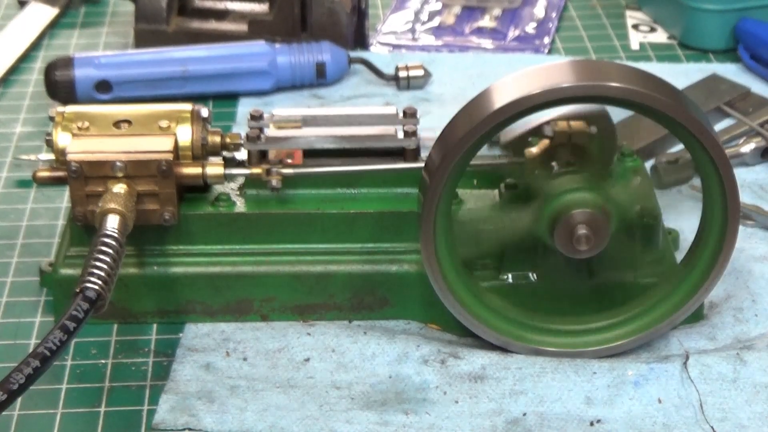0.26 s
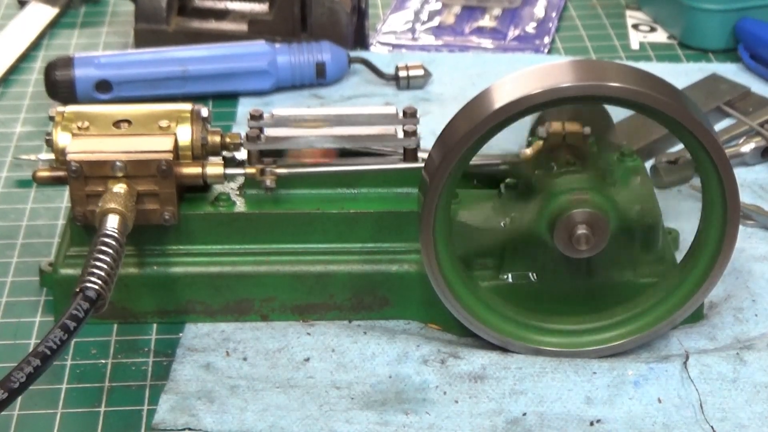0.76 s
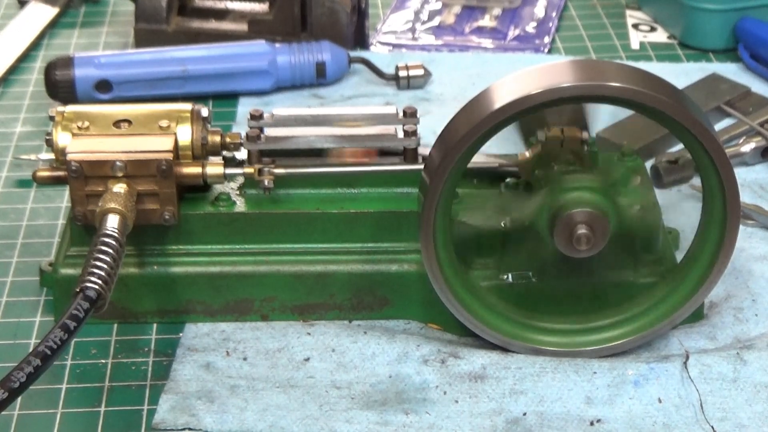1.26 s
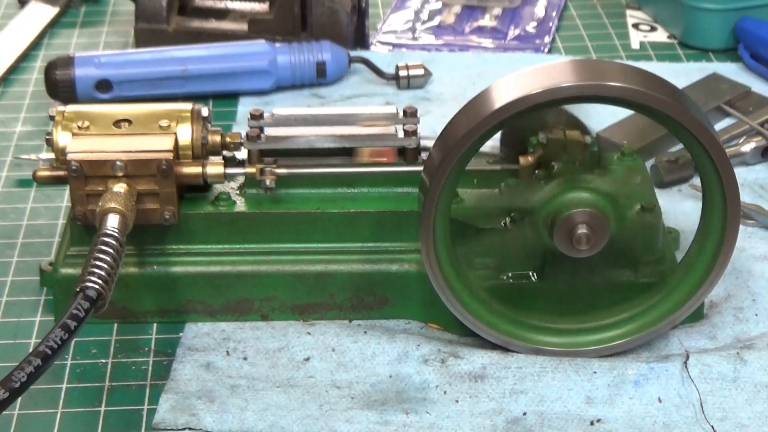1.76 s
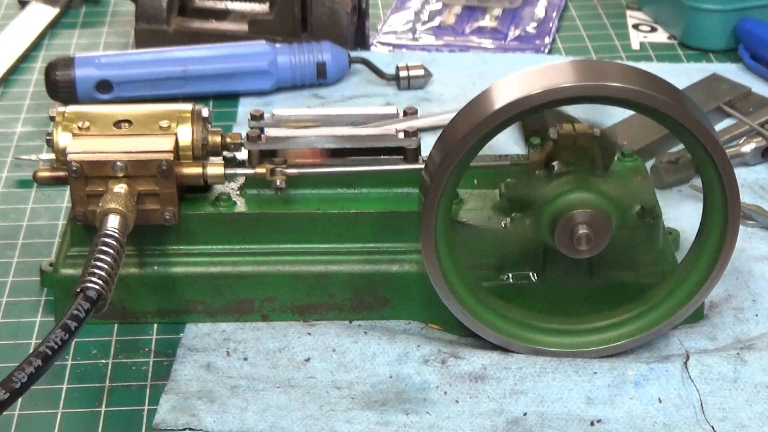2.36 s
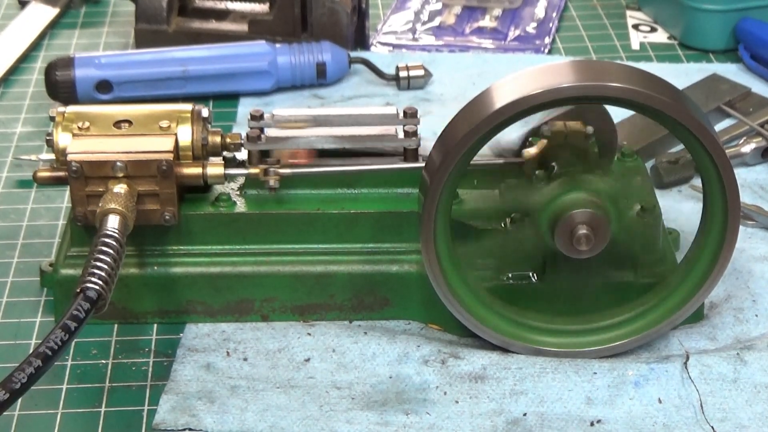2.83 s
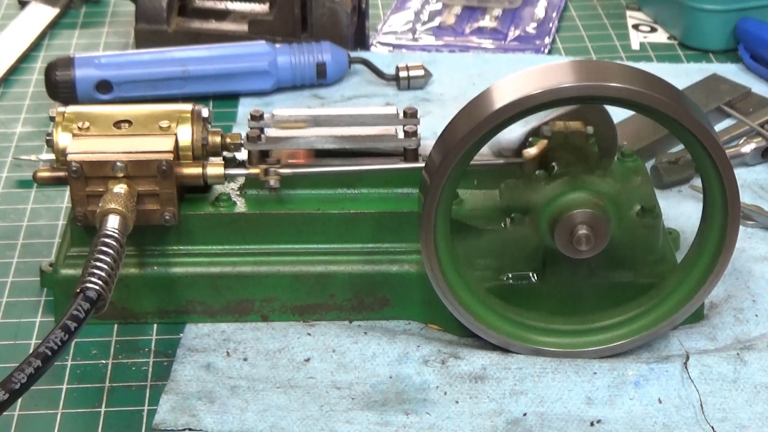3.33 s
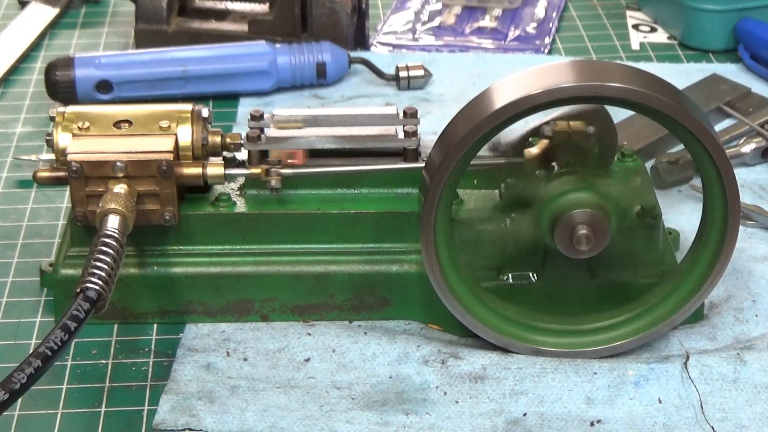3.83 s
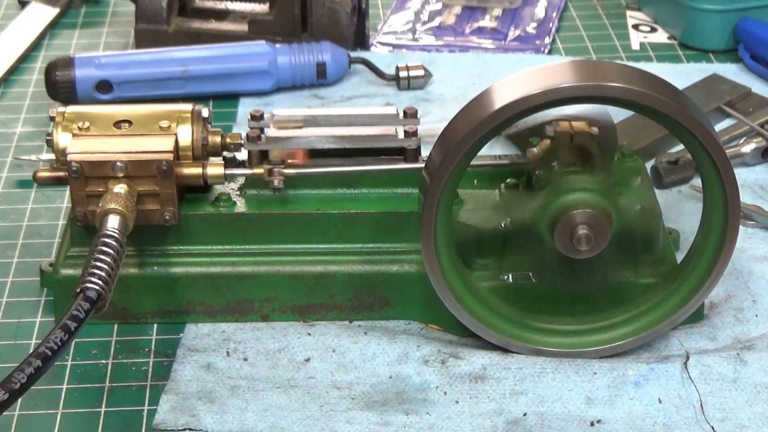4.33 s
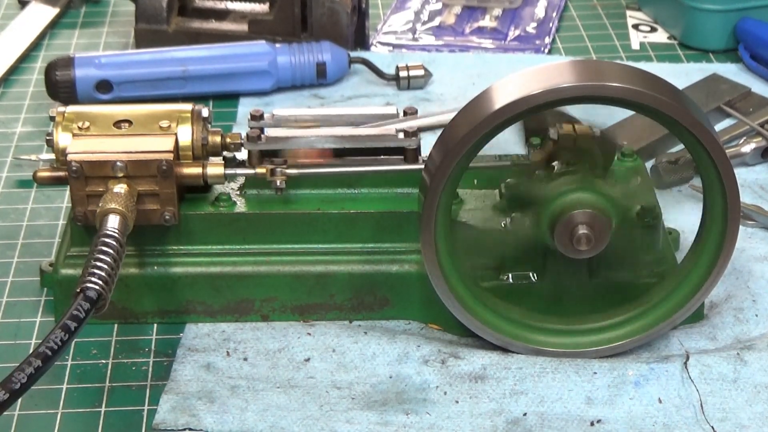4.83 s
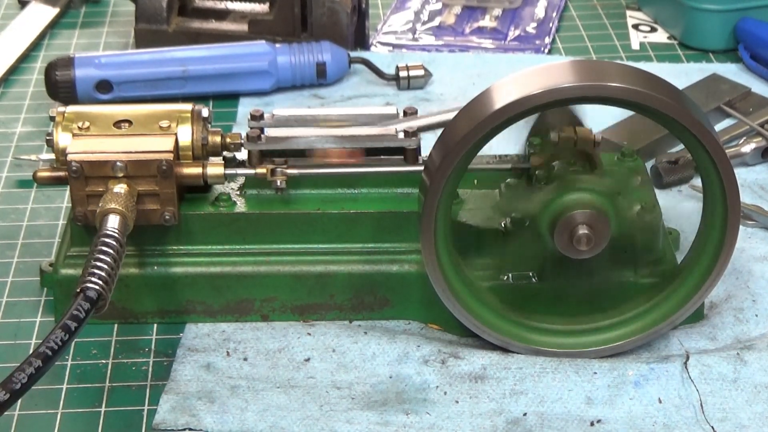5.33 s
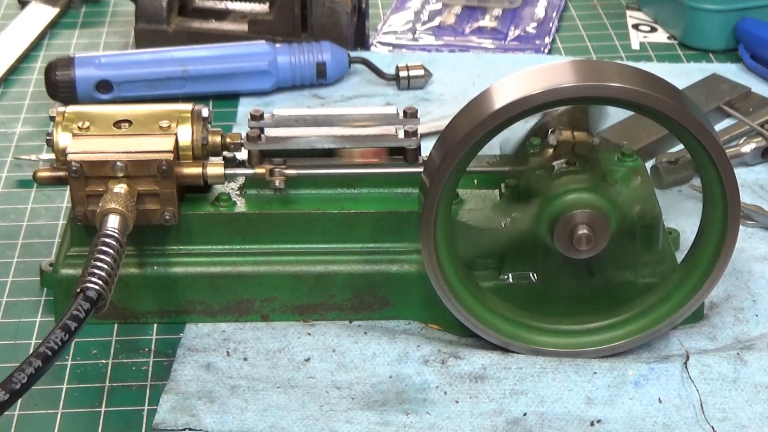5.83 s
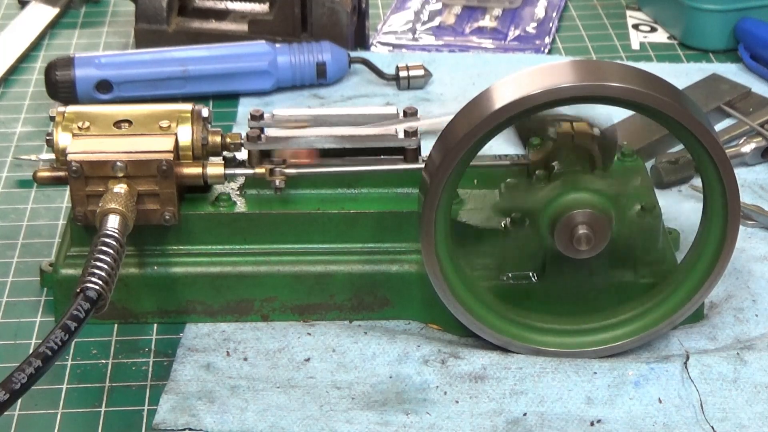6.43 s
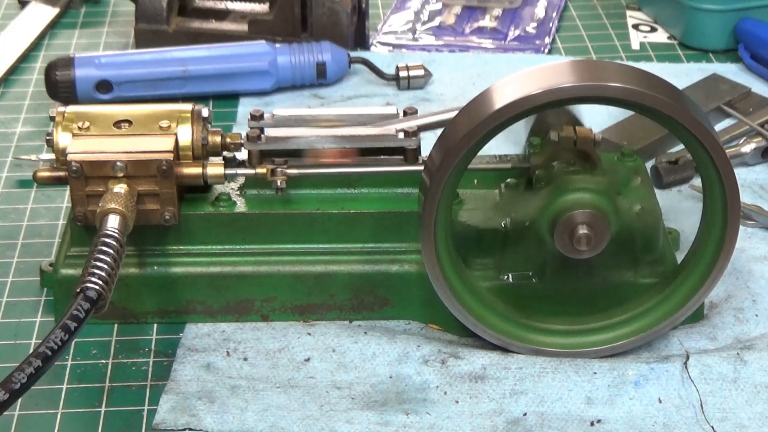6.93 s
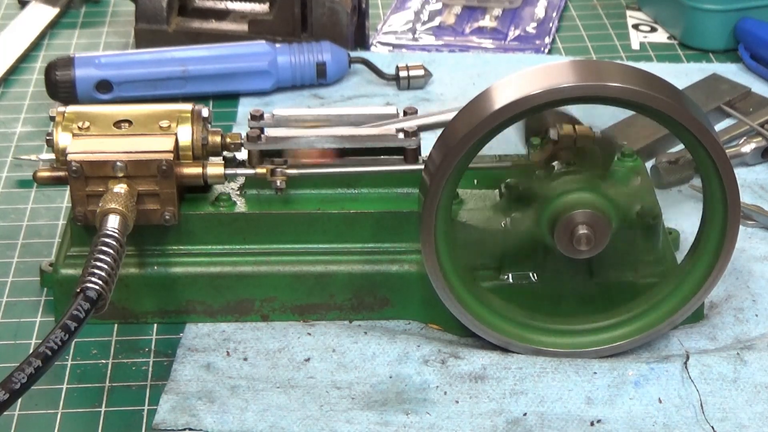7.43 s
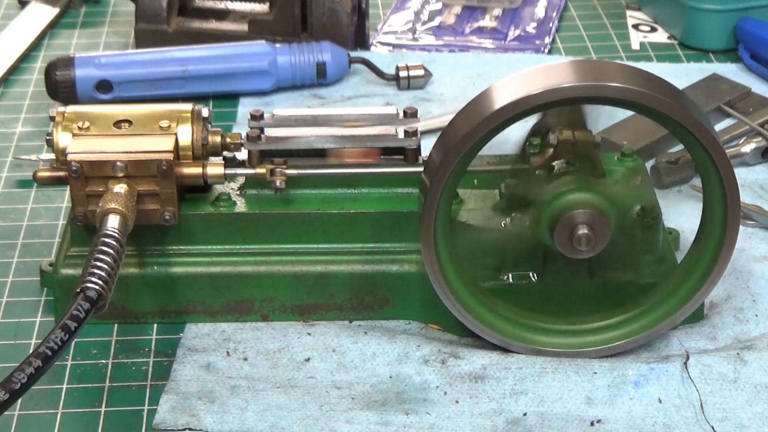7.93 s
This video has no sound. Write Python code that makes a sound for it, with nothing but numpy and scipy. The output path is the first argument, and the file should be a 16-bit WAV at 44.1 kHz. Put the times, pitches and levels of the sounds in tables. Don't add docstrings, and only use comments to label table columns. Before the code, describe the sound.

A small piston engine on compressed air chuffs quickly and sharply at close range, about six turns a second, over a thin compressor whine, after two bench clatters.

```python
import sys
import numpy as np
from scipy import signal
from scipy.fft import rfft, irfft, next_fast_len
from scipy.io import wavfile

SR = 44100
rng = np.random.default_rng(int(sys.argv[2]) if len(sys.argv) > 2 else 0)


def gain_from_db(level_db):
    decades = np.asarray(level_db, float) / 20
    return 10 ** decades


def dump(signal):
    limited = np.clip(np.atleast_2d(signal).T, -1, 1)
    pcm = np.round(limited * 32767).astype(np.int16)
    wavfile.write(sys.argv[1], SR, pcm)


N = 361179
TIME_S = np.arange(N) / SR
START_TURN, TURN_COUNT = .7427, 52


def rms_one(x):
    return x / np.sqrt(np.mean(x ** 2) + 1e-20)


def over_time(points):
    return np.interp(TIME_S, *np.transpose(points))


def at_hz(points, hz):
    point_hz, value = np.transpose(points)
    return np.interp(np.log(hz + 1), np.log(point_hz), value)


def humps(peaks, hz):
    power = 1
    for peak_hz, width_hz, db in peaks:
        power = power + (gain_from_db(db) ** 2 - 1) / (1 + (2 * (hz - peak_hz) / width_hz) ** 2)
    return np.sqrt(power)


def drift(rate):
    pole = np.exp(-80 * np.pi * rate / SR)
    noise = rng.standard_normal(N // 40 + 2002)
    slow = signal.lfilter([1], [1, -2 * pole, pole * pole], noise)[2000:]
    return np.interp(np.arange(N) / 40, np.arange(len(slow)), rms_one(slow))


def ring(clicks, hz, t60):
    decay, step = gain_from_db(-60 / (t60 * SR)), 2 * np.pi * hz / SR
    return signal.lfilter([0, np.sin(step)], [1, -2 * decay * np.cos(step), decay * decay], clicks + 1e-18)


# pitch_hz, side_minus_mid [dB]
SIDE_DB = [(60, -41), (92, -43), (140, -34), (210, -27), (330, -28), (500, -53), (770, -10), (1170, -8),
           (1790, -24), (2740, -19.5), (4190, -21.5), (6410, -19), (9810, -25.5), (15000, -62)]


def coloured(gain_at, side_db):
    size = next_fast_len(N)
    hz = np.arange(size // 2 + 1) * SR / size
    both = rfft(rng.standard_normal((2, size))) * gain_at(hz)
    both[1] *= gain_from_db(at_hz(SIDE_DB, hz) + side_db)
    mid, side = irfft(both, size)[:, :N]
    return np.array([mid + side, mid - side]) / np.std(mid)


# shaft_order [multiple of shaft rate], level_db [dB rms]
ORDERS_DB = [(9, -65), (13, -64), (17, -62), (21, -62), (22, -52), (24, -49), (25, -56), (26, -59),
             (27, -59), (29, -59), (31, -59), (32, -60), (33, -56), (36, -49), (37, -57), (39, -53),
             (41, -56), (44, -50.5), (45, -49), (46, -42), (47, -38), (48, -46), (49, -49), (50, -52),
             (52, -55), (54, -58), (57, -55), (58, -56), (59, -56), (66, -57)]
# pitch_hz, level_db [dB rms]
WEAK_ORDERS = [(40, -73), (100, -68.5), (500, -81), (900, -73), (2000, -74.5), (2800, -58), (3300, -78)]
# pitch_hz, width_hz, height_db
CASING = [(238, 55, 7.5), (712, 54, 15), (1057, 120, 9.5), (1342, 33, 10), (1714, 97, 5)]
# pitch_hz, level_db [dB per Hz]
RUMBLE = [(25, -36), (60, -20), (150, -12), (400, -10), (900, -9.5), (1300, -2.5), (2000, -0.5),
          (3500, -14.5), (6000, -35)]


def compressor():
    motor_hz, motor_start_s, rumble_db = 29.323, .0044, -39.5
    shaft = 2 * np.pi * motor_hz * (TIME_S - motor_start_s) + 0.0048 * drift(0.96)
    out = gain_from_db(rumble_db) * coloured(lambda hz: gain_from_db(at_hz(RUMBLE, hz)) * humps(CASING, hz), side_db=1.5)

    orders, angle = np.arange(2, 112), np.linspace(0, 2 * np.pi, 4097)
    level_db = at_hz(WEAK_ORDERS, orders * motor_hz) + 3.9 * rng.standard_normal(len(orders))
    for order, db in ORDERS_DB:
        level_db[order - 2] = db + 1.04

    spread = 1.75 * (orders - 47) ** 2
    shift = 0.24 * np.clip(orders / 24, 0, 1) ** 2 * np.sign(rng.standard_normal(len(orders)))
    for group in range(4):
        k = slice(group, None, 4)
        swell = gain_from_db(1.0 * drift(3.9))
        for channel, sign in enumerate((1, -1)):
            phase = (spread + sign * shift)[k, None]
            one_turn = gain_from_db(level_db[k]) @ np.cos(np.outer(orders[k], angle) + phase)
            out[channel] += np.sqrt(2) * swell * np.interp(shaft % (2 * np.pi), angle, one_turn)
    return out


# start_s, peak_db, pitch_hz, t60_s
KNOCKS = [(0.102, -19, 1500, .008), (0.1016, -27, 480, .03), (.1075, -11, 2000, 0.012),
          (0.1088, -14, 1236, .04), (0.1252, -9.5, 2150, .015), (.126, -25, 710, 0.037),
          (.127, -28, 320, 0.083), (.18, -16.5, 1300, .018), (.14, -15, 2920, 0.072),
          (.368, -28.5, 230, .07), (.371, -24.5, 640, 0.18), (0.375, -21, 2200, .08),
          (0.39, -28, 342, 0.12), (0.378, -23, 440, .08), (.380, -18, 1800, 0.053), (.382, -17, 1230, 0.03),
          (.384, -28, 1100, 0.06), (0.39, -15, 2620, 0.03), (.3885, -9, 5700, .005),
          (.3932, -4, 5200, .005)]


def knocks():
    out = np.zeros(N)
    for start_s, peak_db, hz, t60 in KNOCKS:
        click, at = np.zeros(SR // 2), round(start_s * SR)
        click[at + rng.integers(60, 600, size=5)] = 0.37 * rng.standard_normal(5)
        click[at] = 1
        pair = ring(click, .95 * hz, t60) + ring(click, 1.06 * hz, t60)
        no_thud = signal.butter(2, 0.41 * hz, "high", fs=SR)
        out[:SR // 2] += gain_from_db(peak_db - 9.5) * signal.lfilter(*no_thud, pair)
    return out


# start_s, speed [turns per s]
SPEED = [(0, 5.4094), (.5, 5.696), (1, 5.7434), (1.9, 5.8065), (2.6, 5.9966), (3.5, 6.0188), (4.4, 6.1899),
         (6, 6.207), (6.5, 6.2656), (8.19, 6.3037)]


def crank_angle():
    return START_TURN + np.cumsum(over_time(SPEED)) / SR


def contact(crank, share, peak_db, hz, t60):
    play_turns = .004
    chance, clicks = rng.standard_normal((TURN_COUNT, 2)), np.zeros(N + 1)
    at = np.searchsorted(crank, np.arange(TURN_COUNT) + share + play_turns * chance[:, 0])
    clicks[at] = gain_from_db(peak_db) * np.sign(chance[:, 1]) * (at > 0)
    return ring(clicks[:N], hz, t60) - ring(clicks[:N], 1.121 * hz, t60)


# turn_share, peak_db, pitch_hz, t60_s
CONTACTS = [(.13, -30, 1876, 0.018), (0.12, -33, 2700, .03), (.33, -43, 1800, .025),
            (.41, -41, 1680, 0.017), (.41, -37.5, 700, 0.028), (0.185, -40, 244, 0.049),
            (.48, -41, 240, 0.032), (.595, -38, 250, 0.045), (.65, -36.5, 245, 0.042), (.79, -41, 242, .05),
            (.92, -41, 250, 0.058), (.02, -44, 245, .04), (.085, -18, 4700, .008), (.465, -18, 4800, .008)]
# turn_share, peak_db, pitch_hz, t60_s
CROSSHEAD = (.562, -26.5, 1780, .016)


def linkage(crank):
    share, peak_db, hz, t60 = CROSSHEAD
    out = contact(crank, share, peak_db + 4.5 * rng.standard_normal(TURN_COUNT), hz, t60)
    for share, peak_db, hz, t60 in CONTACTS:
        out += contact(crank, share, peak_db + 1.4 * rng.standard_normal(TURN_COUNT), hz, t60)
    return out


# pitch_hz, level_db [dB per Hz]
AIR = [(1500, -25.5), (2400, -21), (3100, -15.5), (3600, -12), (4050, -2.5), (5000, -6), (6100, -10),
       (7500, -8), (8000, -15.5), (8350, -10.5), (8800, -2), (11500, -1.5), (13100, -12.5), (15600, -25.5)]
# pitch_hz, width_hz, height_db
PIPE = [(4500, 180, 2), (6700, 180, 3.5), (7520, 95, 3.5)]


def jet(opening, tilt, level_db, crank, rough_db):
    share, db = np.transpose(opening)
    gain_db = np.interp(crank % 1, share, db) + rough_db * (0.16 * drift(64) + drift(350))
    hiss = coloured(lambda hz: gain_from_db(at_hz(AIR, hz) + at_hz(tilt, hz)) * humps(PIPE, hz), side_db=3.0)
    return gain_from_db(level_db + gain_db) * hiss


# turn_share, level_db
PUFF = [(.062, -18), (.083, -4), (.1, 1.5), (.125, -1), (.15, -6), (.2, -22)]
OUT_STROKE = [(.16, -22), (.22, -9), (.27, -3.5), (.36, -.5), (.42, -.5), (.465, 2), (.485, 1.5),
              (.503, -8), (.525, -24)]
RELEASE = [(.508, -26), (.533, 0), (.57, -2), (.62, -7), (.7, -25)]
BACK_STROKE = [(.52, -17), (.542, 0), (.58, 2.5), (.65, 0), (.72, -4.5), (.8, -5.5), (.85, -9), (.89, -20),
               (.95, -35)]
LEAK = [(0, 1), (.045, 2), (.065, -5.5), (.1, 6), (.2, 3), (.85, 3), (.95, -3), (1, 3)]
# pitch_hz, level_db
PUFF_TILT = [(2000, -7.5), (2800, -6.5), (4200, 3.5), (6200, 4), (10000, -0.5), (14000, 7)]
OUT_TILT = [(2000, -9), (2800, 5), (4200, 2.5), (6200, 6), (10000, 3.5), (14000, 9)]
RELEASE_TILT = [(2000, -12), (2800, -20), (4200, 0), (6200, 8.5), (10000, -9.5), (14000, 10.5)]
BACK_TILT = [(2000, -1.5), (2800, 5), (4200, -5), (6200, 0.5), (10000, 1), (14000, 4.5)]
LEAK_TILT = [(2000, 0.5), (2800, 3), (4200, 3), (6200, 0.5), (10000, 0.5), (14000, 1)]
# start_s, level_db
PUFF_FORCE = [(0, -2), (1.8, -1), (3, 0.5), (4.2, -.5), (5.5, -1), (8.19, -1.5)]
# start_s, level_db
PRESSURE = [(0.0, -1), (8.19, -1)]
# pitch_hz, level_db, t60_s
CYLINDER = [(2570, -48, 0.051), (2748, -35.5, 0.038), (2900, -41.5, 0.028)]


def exhaust(crank):
    turn_spread_db = 2.1 * rng.standard_normal(TURN_COUNT)
    puff_db = -11 + turn_spread_db[crank.astype(int)] + over_time(PUFF_FORCE)
    air = jet(PUFF, PUFF_TILT, puff_db, crank, rough_db=1.8)
    air += jet(OUT_STROKE, OUT_TILT, -16.5, crank, rough_db=1.6)
    air += jet(RELEASE, RELEASE_TILT, -15.5, crank, rough_db=0.5)
    air += jet(BACK_STROKE, BACK_TILT, -15, crank, rough_db=1.34)
    air += jet(LEAK, LEAK_TILT, -24, crank, rough_db=0.3)
    air *= gain_from_db(over_time(PRESSURE))
    air += sum(gain_from_db(db) * ring(air, hz, t60) for hz, db, t60 in CYLINDER)

    echo_s, echo_hz, echo_db = .0159, 7000, -9
    band = signal.butter(2, [echo_hz / 1.01, echo_hz * 1.37], "band", fs=SR, output="sos")
    echo = np.roll(signal.sosfilt(band, air), round(echo_s * SR), axis=1)
    return air + gain_from_db(echo_db) * echo * gain_from_db([[1.5], [-1.5]])


# pitch_hz, level_db
SHOP = [(300, -20), (1000, -9), (3000, -8), (7000, -11), (9000, -18), (15000, -18)]
# pitch_hz, left_minus_right [dB]
BALANCE_DB = [(450, 0), (740, -5), (1220, -2), (2000, -1), (6000, 1), (10000, .3), (12000, 0)]


def workshop(x):
    t60_s = 0.089
    size, time = next_fast_len(N + SR // 4), np.arange(SR // 8) / SR
    taps = rng.standard_normal(len(time)) * (rng.random(len(time)) < .02)
    taps *= gain_from_db(-60 * time / t60_s) * (time > .002)
    hz = np.arange(size // 2 + 1) * SR / size
    room = 1 + gain_from_db(at_hz(SHOP, hz)) * rfft(taps / np.sqrt(np.sum(taps ** 2)), size)
    lean = gain_from_db(at_hz(BALANCE_DB, hz) * [[.5], [-.5]])
    return irfft(rfft(x, size) * room * lean, size)[:, :N]


def scene():
    crank = crank_angle()
    bench = workshop(knocks() + linkage(crank) + exhaust(crank))
    return bench + compressor() * gain_from_db([[-.1], [.1]])


# deepest_at [turn share], sinking_for [turn share], depth_db
DUCKS = [
    (.1, .03, 4.2),
    (.59, .19, 3.5),
]


def gain_control(crank):
    recover_db_per_turn = 21
    gain_db = np.zeros(N)
    for at, fall, depth_db in DUCKS:
        corners = [at - fall, at, at + depth_db / recover_db_per_turn]
        gain_db -= np.interp(crank % 1, corners, [0, depth_db, 0])
    return gain_db


def band_limit(x):
    return signal.sosfilt(signal.butter(12, 15940, fs=SR, output="sos"), x)


def record(dry):
    ceiling = .85
    ducked = ceiling * np.tanh(dry * gain_from_db(gain_control(crank_angle())) / ceiling)
    bass_cut = signal.butter(2, 45, "high", fs=SR, output="sos")
    top_cut = signal.cheby2(10, 50, 17000, fs=SR, output="sos")
    mix = signal.sosfilt(np.r_[bass_cut, top_cut], ducked)
    return band_limit(mix)


dry = scene()
out = record(dry)
dump(out)
```